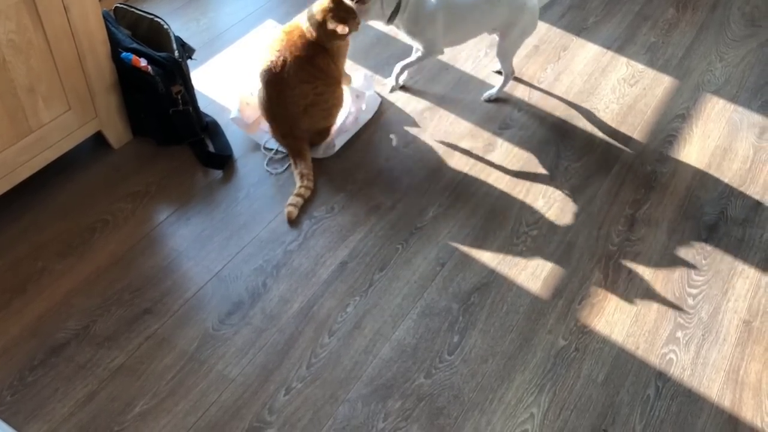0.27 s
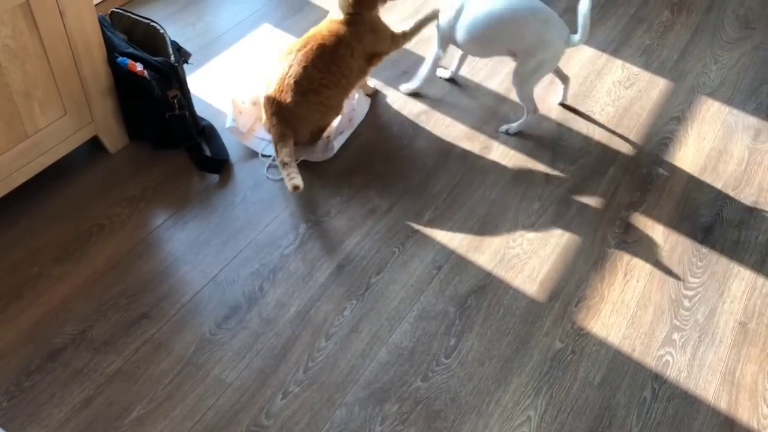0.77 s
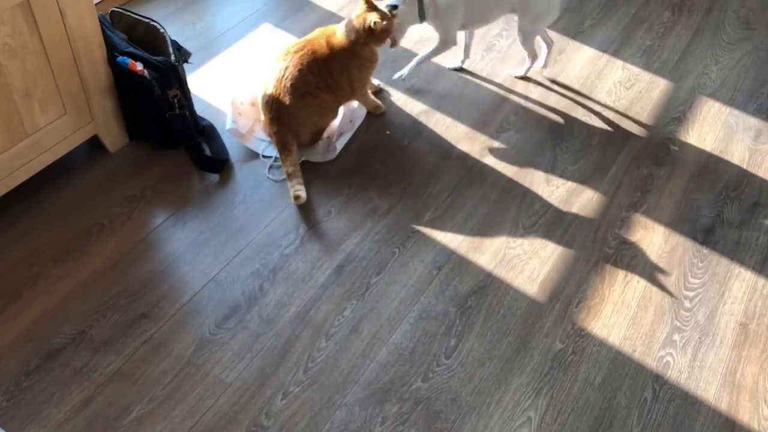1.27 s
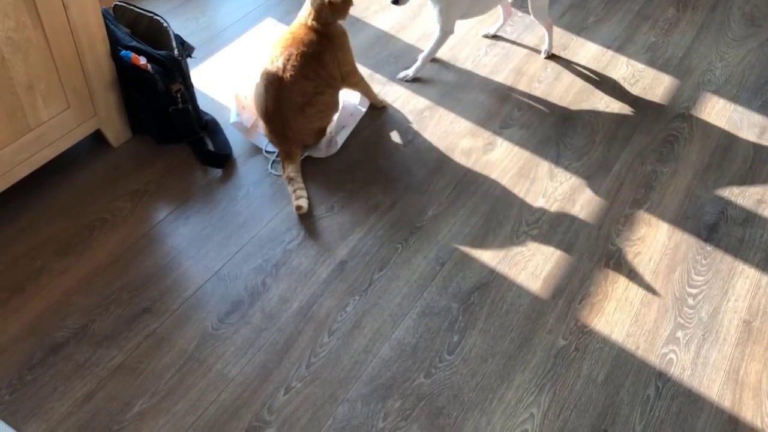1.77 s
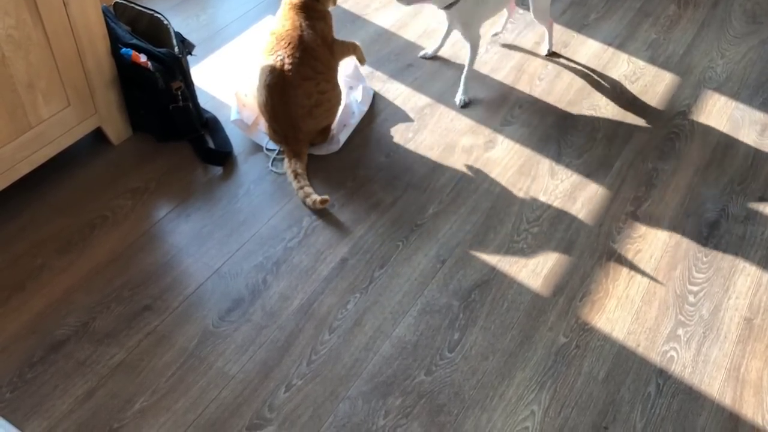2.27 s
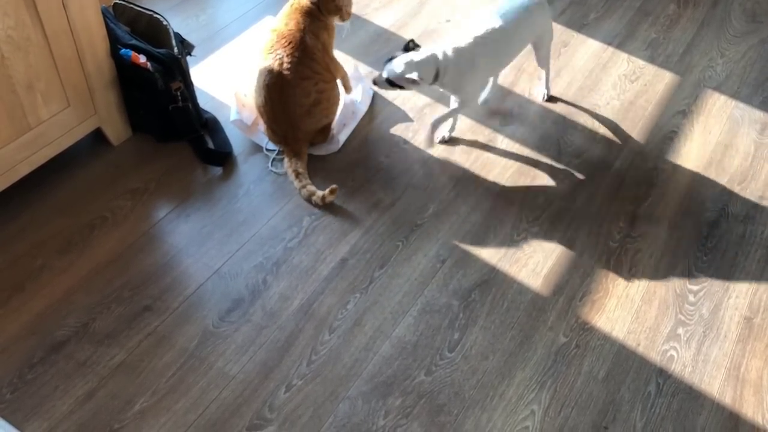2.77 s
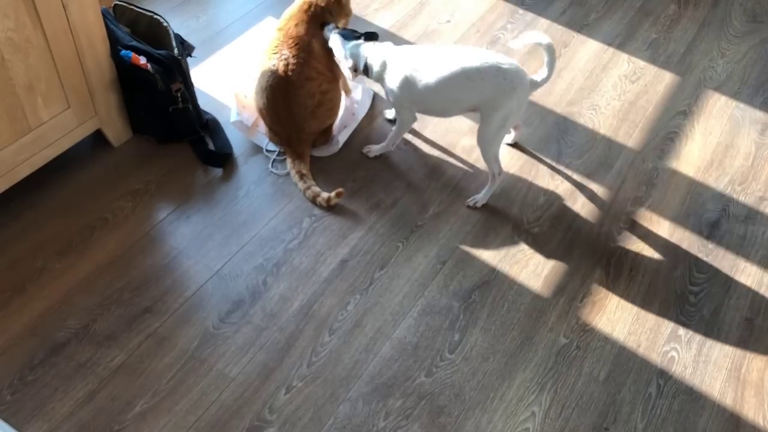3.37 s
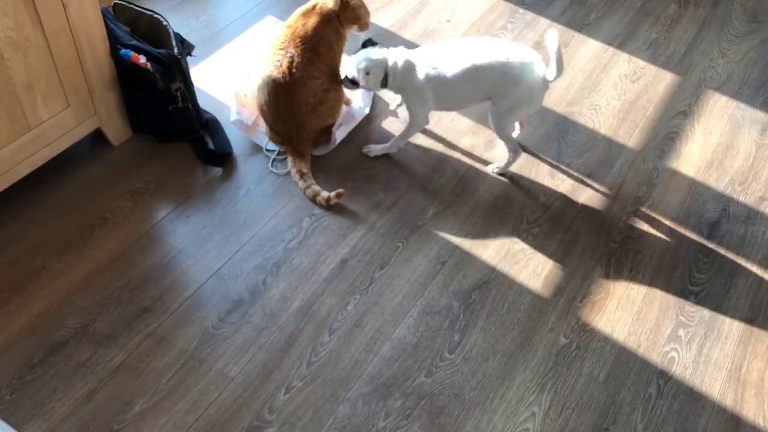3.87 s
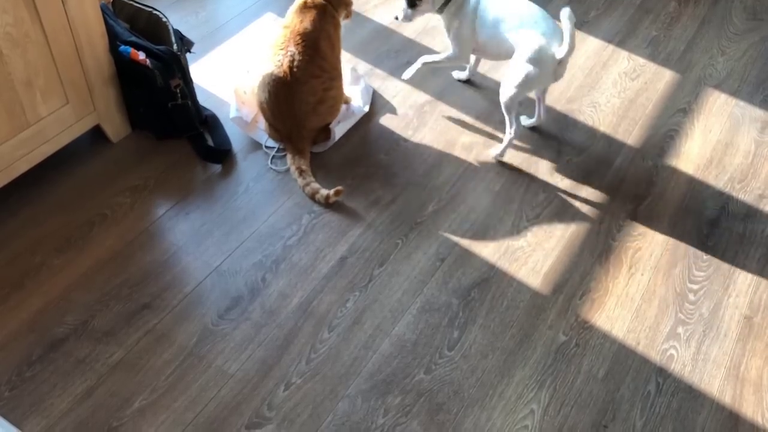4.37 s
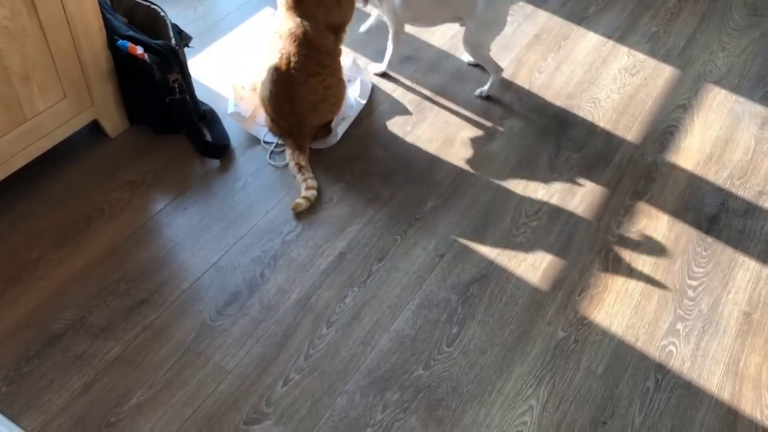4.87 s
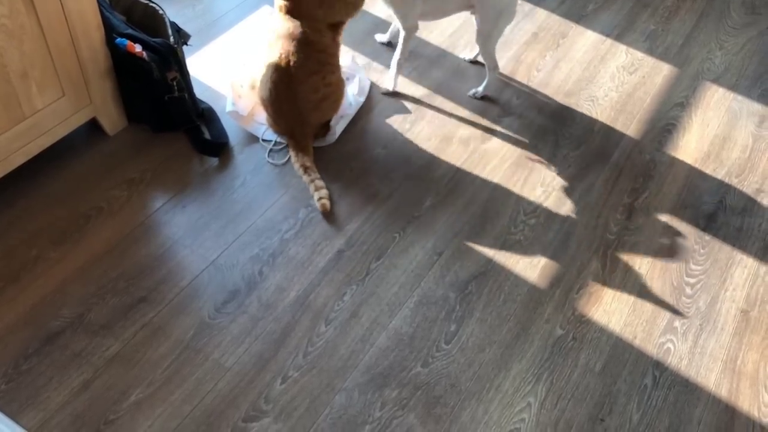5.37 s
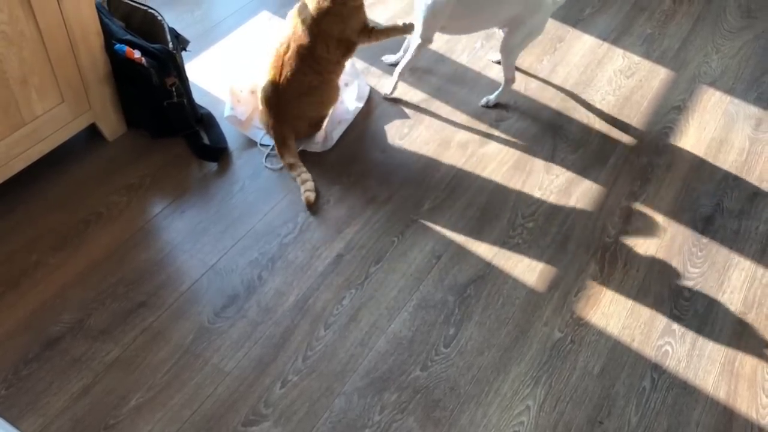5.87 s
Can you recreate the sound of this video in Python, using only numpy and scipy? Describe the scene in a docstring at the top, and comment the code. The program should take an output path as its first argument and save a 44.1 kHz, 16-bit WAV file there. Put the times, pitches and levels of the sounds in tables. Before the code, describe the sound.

Light, uneven animal footsteps on hard boards: dry claw clicks over muted pad thumps, a firm landing early on, then scattered taps with small gaps. A thin plastic bag rustles in brief bright bursts, and paws brush softly. A single hollow bump rings briefly before the midpoint. Clicks become firmer towards the end. Reverberant indoor space, heard from a few metres on a handheld phone, over a quiet low background.

```python
"""A bare room with a hard wooden floor: a dog trots round a cat, a few metres from a phone. Claws are short
noise skids through a horn resonance; paws are soft pushes that ring the boards. A plastic bag crackles in dense
random clicks; fur and pads scuff as swells of filtered noise. Echoes and a diffuse tail draw these out; a
hollow panel, bumped once, rings on its own modes. Faint room tone and low hand rumble, both shaped noise, lie
under everything; a sharp click ends it."""
import sys
import numpy as np
from scipy import signal
from scipy.fft import rfft, irfft
from scipy.io import wavfile

SR = 44100
rng = np.random.default_rng(int(sys.argv[2]) if len(sys.argv) > 2 else 0)


def master_out(mix):
    """Clip the mix to full scale and print it as 16-bit PCM to the path in sys.argv[1]."""
    frames = np.transpose(np.atleast_2d(mix))
    ceiling = np.clip(frames, -1, 1)
    pcm = np.round(ceiling * 32767).astype(np.int16)
    wavfile.write(sys.argv[1], SR, pcm)


N = 270377


def undb(db):
    """Decibels to amplitude."""
    return 10 ** (np.asarray(db) / 20)


def unit(x):
    """Scale to an RMS of 1."""
    return x / np.sqrt(np.mean(x ** 2))


def colour(x, points):
    """Filter by a curve of (frequency [Hz], gain [dB]) points, -90 dB outside it."""
    hz, db = np.transpose(points)
    f = np.maximum(np.fft.rfftfreq(len(x), 1 / SR), .1)
    gain_db = np.interp(np.log(f), np.log(hz), db, left=-90, right=-90)
    return irfft(rfft(x) * undb(gain_db), len(x))


def ring(x, hz, width_hz):
    """Two-pole resonance, gain 1 at the centre."""
    b, a = signal.iirpeak(hz, hz / width_hz, fs=SR)
    return signal.lfilter(b, a, x)


def add(track, s, sound):
    """Mix a sound in at time s."""
    i = int(s * SR)
    track[i:i + len(sound)] += sound[:N - i]


def swell(ms):
    """A soft rise and fall lasting ms, then silence up to half a second."""
    shape = np.zeros(SR // 2)
    count = int(ms * SR / 1000)
    shape[:count] = np.hanning(count)
    return shape


def burst(ms, rise_ms):
    """Rough contact: noise that rises fast and dies within about ms, with its energy evened out."""
    t_ms = np.arange(2048) / SR * 1000
    shape = (1 - np.exp(-t_ms / rise_ms)) * np.exp(-(t_ms / ms) ** 4)
    sound = rng.standard_normal(2048) * shape
    return sound * np.sqrt(np.sum(shape ** 2) / np.sum(sound ** 2))


# Spectrum of the room's bed: (frequency [Hz], relative level [dB per Hz])
TONE_SPECTRUM = [(35, 17), (60, -7.5), (196, -1), (498, -4), (706, -1), (1180, -10), (1970, -13.5),
                 (2660, -16), (4140, -19.5), (8710, -20.5), (15600, -30.5)]
TONE_DB = -68  # overall RMS


def room_tone():
    """The faint steady bed of the room, as shaped noise."""
    return undb(TONE_DB) * unit(colour(rng.standard_normal(N), TONE_SPECTRUM))


# Spectrum of the hand on the phone: (frequency [Hz], relative level [dB per Hz])
RUMBLE_SPECTRUM = [(1.8, -35), (3.0, 16), (16, 2), (69, -14), (103, -13), (125, -24), (150, -22),
                   (200, -32), (330, -120)]
RUMBLE_DB = -56.5  # overall RMS


def hand_rumble():
    """The hand on the phone, as noise concentrated in the lowest frequencies."""
    return undb(RUMBLE_DB) * unit(colour(rng.standard_normal(N), RUMBLE_SPECTRUM))


# Treble colour of the phone's microphone, applied to bag and claws: (frequency [Hz], gain [dB])
BRIGHT_COLOUR = [(880, -36), (1500, -1.5), (1930, -15), (2110, -2), (2650, -12.5), (4030, -0.5),
                 (4580, -4.5), (9740, -2), (14100, -15), (15600, -26)]
# Crackles of the bag: (time [s], level before colouring and swell [dB], swell length [ms])
BAG_CRACKLES = [(0, -62.5, 20), (.30, -55, 107), (0.622, -43.5, 46), (0.673, -47.5, 59), (0.763, -42, 78),
                (0.99, -55, 52), (1.131, -60, 82), (1.238, -55, 61), (1.367, -59.5, 93), (1.461, -48, 25),
                (1.8, -67, 78), (2.6, -55, 30), (2.654, -50.5, 29), (2.71, -52, 27), (2.929, -62.5, 100),
                (3.074, -55.5, 130), (3.615, -54, 34), (3.826, -49.5, 32), (3.899, -48, 19),
                (4.705, -53, 24), (4.79, -56.5, 22), (4.918, -44, 58), (5.351, -55.5, 23), (5.416, -46, 17),
                (5.438, -55, 116), (5.901, -55.5, 44), (5.989, -45, 61), (6.06, -46, 170)]
BAG_HZ = 7160
CREASES_PER_S, CREASE_SPREAD_DB = 5000, 1.5  # mean count; mean of the exponential spread in size


def bag():
    """Creasing plastic snaps in dense clicks of random time, sign and size, under a soft swell."""
    out = np.zeros(N)
    for s, db, ms in BAG_CRACKLES:
        chance, side, size = rng.random((3, SR // 2))
        snaps = (chance < CREASES_PER_S / SR) * np.sign(side - .5)
        creases = snaps * undb(-CREASE_SPREAD_DB * np.log(1 - size))
        crackle = unit(ring(creases, BAG_HZ, 2.0 * BAG_HZ))
        add(out, s, undb(db) * swell(ms) * crackle)
    return colour(out, BRIGHT_COLOUR)


# Pads and fur sliding, the dog snuffling: (time [s], level before swell [dB], centre [Hz],
# breadth [share of centre, held to 0.1-2.5], swell length [ms])
SCUFF_SWELLS = [(0, -54, 825, 1.3, 13.6), (.36, -55.5, 970, 1.1, 83), (.59, -65, 1390, 5.1, 94),
                (.975, -56.5, 2230, 0.3, 60), (.99, -55.5, 1457, 0.16, 72), (1.25, -65, 900, 1.6, 177),
                (1.54, -65.5, 1460, 0.37, 74), (2.97, -75.5, 720, 2.8, 250), (3.19, -64, 1460, 0.88, 83),
                (3.58, -71, 780, 2.2, 97), (4.70, -62.5, 880, 1.2, 104), (4.90, -81, 1390, 0.75, 32),
                (5.46, -66, 1350, 1.14, 200), (6.04, -53.5, 1330, 2.8, 97)]


def scuffs():
    """Soft friction and puffs of air: noise passed twice through one resonance."""
    out = np.zeros(N)
    for s, db, hz, breadth, ms in SCUFF_SWELLS:
        width = hz * np.clip(breadth, .1, 2.5)
        noise = rng.standard_normal(SR // 2)
        friction = unit(ring(ring(noise, hz, width), hz, width))
        add(out, s, undb(db) * swell(ms) * friction)
    return out


# Claws on the boards, the last row a sharp click at the end: (time [s], level before colouring [dB], horn
# resonance [Hz])
CLAW_TICKS = [(0.0795, -39.5, 5200), (0.459, -59, 8000), (0.4618, -36.5, 10700), (0.8204, -24, 6400),
              (1.065, -39.5, 8600), (1.3503, -43, 5600), (1.4434, -45.5, 9100), (1.625, -45.5, 4960),
              (1.6933, -32.5, 4600), (1.901, -42.5, 4680), (2.3051, -36, 6200), (2.4244, -50, 8450),
              (2.591, -39.5, 4670), (2.693, -41.5, 5730), (2.9236, -43, 4250), (3.278, -34.5, 6300),
              (3.7155, -37, 6040), (3.9927, -33.5, 5600), (4.191, -50, 6370), (4.3206, -42.5, 5000),
              (4.329, -42.5, 7100), (4.4068, -50, 7500), (4.725, -52, 9500), (4.8533, -44, 6810),
              (5.015, -28, 6250), (5.141, -42.5, 4500), (5.416, -35, 6440), (5.6076, -42.5, 9400),
              (5.762, -32.5, 5700), (5.88, -42, 7100), (6.128, -27, 5660)]
SKID_MS, SKID_MS_PER_DB, FIRM_DB = 2.7, -.03, -33.5  # skid at the firm level; lighter ones drag longer
CLAW_BREADTH, CLAW_BROAD_SHARE = 0.81, 0.36  # resonance width as share of centre; unfiltered part


def claws():
    """Each claw chatters over the varnish for a few ms; the small horn tip sets the colour."""
    out = np.zeros(N)
    for s, db, hz in CLAW_TICKS:
        skid_ms = SKID_MS + SKID_MS_PER_DB * (db - FIRM_DB)
        chatter = burst(skid_ms, rise_ms=0.14)
        horn = ring(chatter, hz, CLAW_BREADTH * hz)
        add(out, s, undb(db) * (horn + CLAW_BROAD_SHARE * chatter))
    return colour(out, BRIGHT_COLOUR)


# Paw landings: (time [s], thud peak level [dB], thud centre [Hz], knock level re thud [dB])
PAW_LANDINGS = [(0.2752, -43.5, 730, -3.5), (0.328, -47.5, 805, 3), (0.368, -37, 600, -4),
                (0.373, -43, 210, -25), (0.701, -51.5, 680, -14), (0.786, -33, 555, -5.5),
                (0.802, -32, 620, -7), (0.823, -33, 550, -22), (1.153, -44, 560, -2),
                (1.172, -41.5, 320, -32), (1.664, -42.5, 520, 4), (1.686, -40.5, 910, -7),
                (1.82, -52, 279, -20), (1.9014, -45, 795, 4), (2.174, -87, 760, -56),
                (2.306, -51.5, 720, -17), (2.907, -53.5, 740, -7), (3.276, -53, 910, 8),
                (3.7382, -50.5, 740, 6), (3.908, -50, 660, -6), (3.994, -49.5, 730, 1.5),
                (4.318, -57.5, 696, -18), (4.551, -61, 249, -19), (4.761, -42.5, 324, -27),
                (4.856, -53.5, 258, 6.5), (4.886, -52.5, 356, 4), (5.016, -44, 520, -40),
                (5.292, -56.5, 1050, -18), (5.403, -47, 860, -1), (5.761, -49, 920, -1),
                (5.91, -49.5, 766, -5), (5.943, -54.5, 293, -7)]
PUSH_MS = 0.73  # contact time of a pad
MEAN_PAD_GAP_MS, PAD_FADE_DB = 2.399, -3  # average lag and level step from pad to pad
THUD_BREADTH = 0.95  # width of the boards' first resonance as share of its centre


def paws():
    """Three pads push the boards at random short lags and ring them; the toes add a short knock."""
    out = np.zeros(N)
    t_ms = np.arange(4096) * 1000 / SR
    for s, db, hz, knock_db in PAW_LANDINGS:
        push = np.zeros(4096)
        for k, chance in enumerate(rng.random(3)):
            lag_ms = MEAN_PAD_GAP_MS * k * 2 * chance
            contact = np.clip((t_ms - lag_ms) / PUSH_MS, 0, 1)
            push += undb(PAD_FADE_DB * k) * np.sin(np.pi * contact) ** 2
        knock = ring(ring(push, 1840, 2270), 2480, 3160)
        width = hz * THUD_BREADTH
        thud = ring(ring(push, hz, width), hz, 2.55 * width)
        landing = thud / thud.max() + undb(knock_db) * knock / knock.max()
        add(out, s, undb(db) * landing)
    return out


# Decay of the diffuse field: (frequency [Hz], time to fall 60 dB [s])
ROOM_DECAY = [(200, 0.34), (500, 0.48), (1400, 0.81), (3700, 0.6), (7000, 0.42), (13000, 0.43)]
# Early echoes off near cupboards and walls: (delay [ms], level re direct [dB])
EARLY_ECHOES = [(5, -4.5), (8.5, -5), (11.5, -13.5), (16, -17.5)]
DIFFUSE_DB = 5.5  # gain of the diffuse field
BUILD_S = 0.0055  # time constant of its build-up


def room(x):
    """Direct sound, early echoes, and a diffuse field whose energy builds and dies band by band."""
    response = np.zeros(2048)
    response[0] = 1
    for ms, db in EARLY_ECHOES:
        response[int(ms * SR / 1000)] += undb(db)
    hz, t60 = np.transpose(ROOM_DECAY)
    build = np.exp(-1 / (BUILD_S * SR))
    field = np.zeros(N)
    for band in 125 * 2 ** np.arange(0, 7, 1 / 6):  # sixth-octave centres
        edges = [band * 2 ** (-1 / 12), band * 2 ** (1 / 12)]
        sixth = signal.butter(2, edges, "band", fs=SR, output="sos")
        # share of the energy kept from one sample to the next
        keep = 1000 ** (-2 / (SR * np.interp(np.log(band), np.log(hz), t60)))
        energy = signal.lfilter([1 - keep], [1, -keep], signal.sosfilt(sixth, x) ** 2)
        energy = signal.lfilter([1 - build], [1, -build], energy)
        # running noise stands in for late reflections that shift as the animals move
        reflections = unit(signal.sosfilt(sixth, rng.standard_normal(N)))
        field += np.sqrt(energy) * reflections
    return signal.fftconvolve(x, response)[:N] + undb(DIFFUSE_DB) * field


# A paw bumping the hollow panel: (time [s], level [dB])
PANEL_BUMPS = [(2.672, -48)]
# Modes of the panel: (frequency [Hz], level re bump [dB], time to fall 60 dB [s])
PANEL_MODES = [(460, -6, .12), (517, -4, .3), (564, 0, .36), (632, 0, .33), (668, -6, .3), (705, -1, .18),
               (1017, -15, .15)]


def panel():
    """A hollow knock: close modes of alternating sign beat together as they fade."""
    out = np.zeros(N)
    t = np.arange(SR // 2) / SR
    modes = np.zeros(SR // 2)
    for k, (hz, db, t60) in enumerate(PANEL_MODES):
        modes += (-1) ** k * undb(db - 60 * t / t60) * np.sin(2 * np.pi * hz * t)
    knock = (1 - np.exp(-t / 0.0005)) * modes  # 0.5 ms onset
    for s, db in PANEL_BUMPS:
        add(out, s, undb(db) * knock)
    return out


def scene():
    """Animals and bag sound in the room; panel, room tone and rumble join without added echo."""
    animals = room(bag() + scuffs() + claws() + paws())
    return (animals + panel() + room_tone() + hand_rumble())[None]


TOP_HZ = 15730  # upper limit of the phone


def record(dry):
    """The phone cuts the top with a steep low-pass."""
    top_cut = signal.ellip(12, .2, 70, TOP_HZ, fs=SR, output="sos")
    return signal.sosfilt(top_cut, dry)


dry = scene()
out = record(dry)
master_out(out)
```